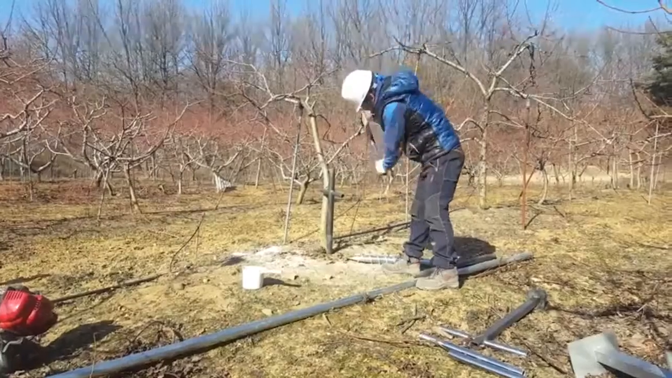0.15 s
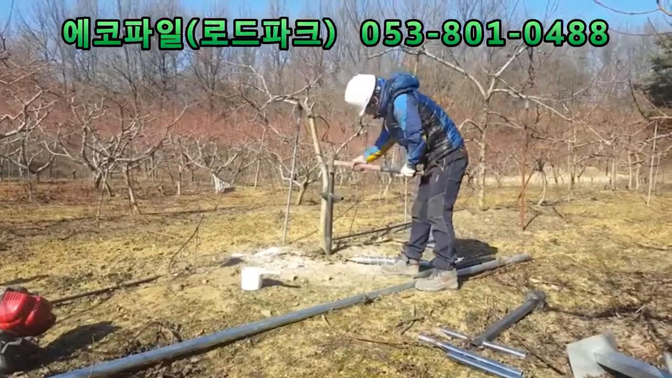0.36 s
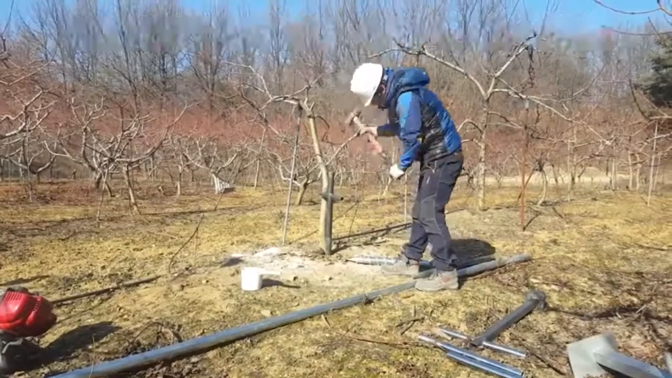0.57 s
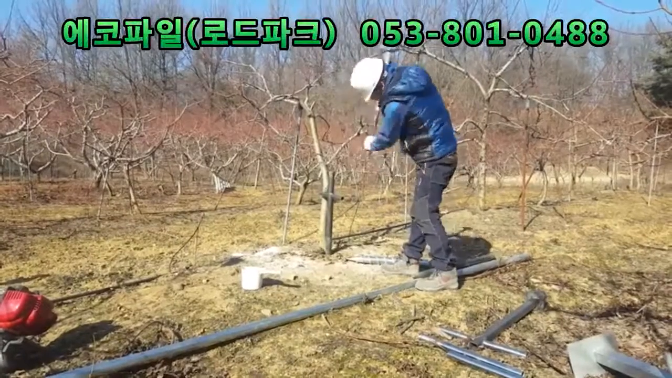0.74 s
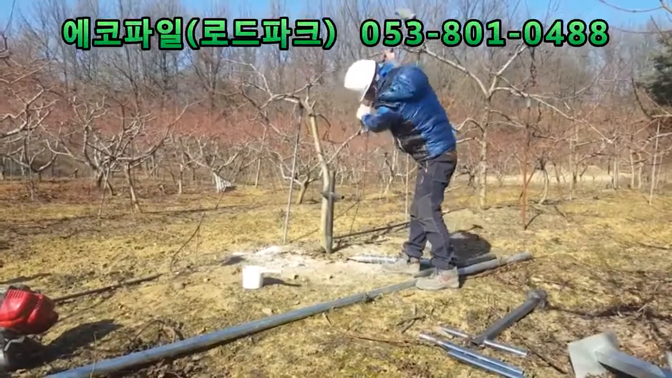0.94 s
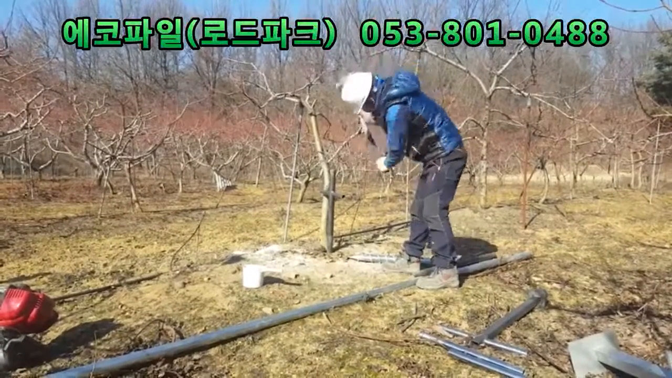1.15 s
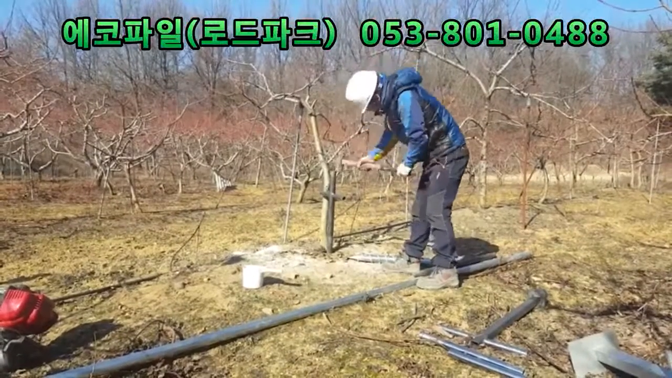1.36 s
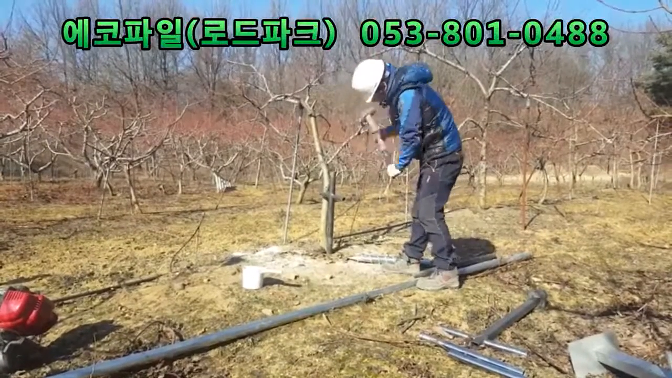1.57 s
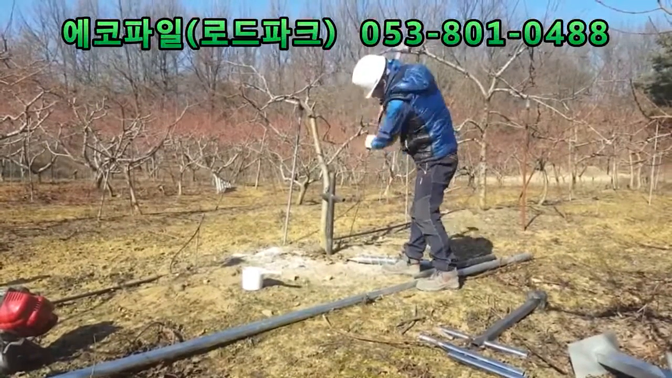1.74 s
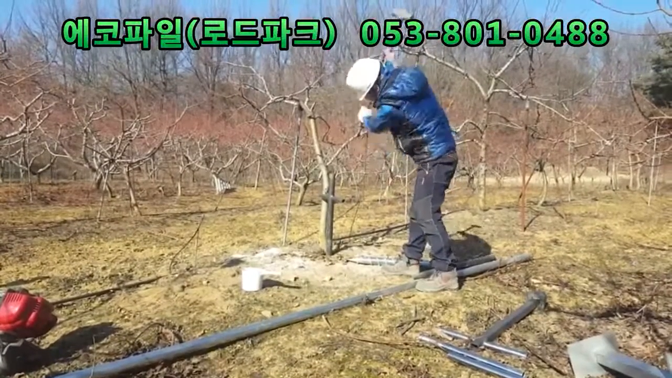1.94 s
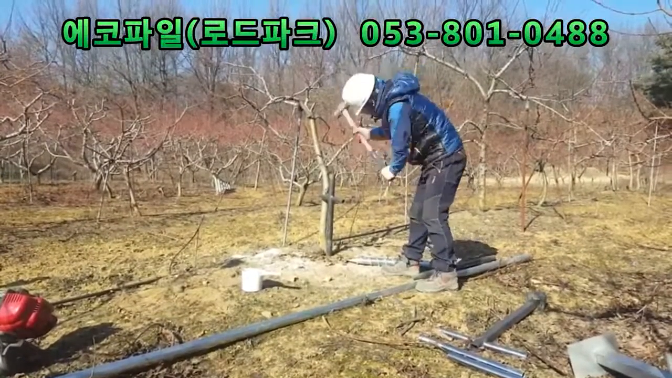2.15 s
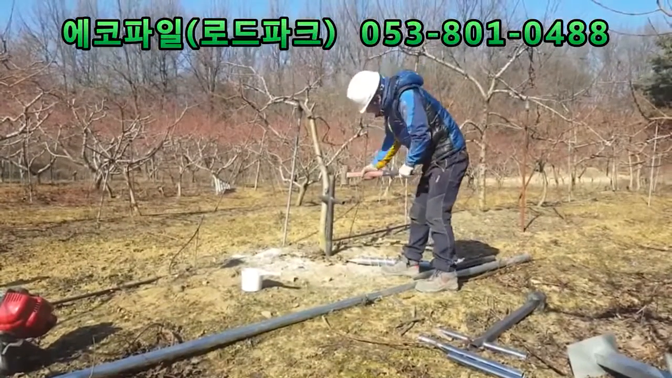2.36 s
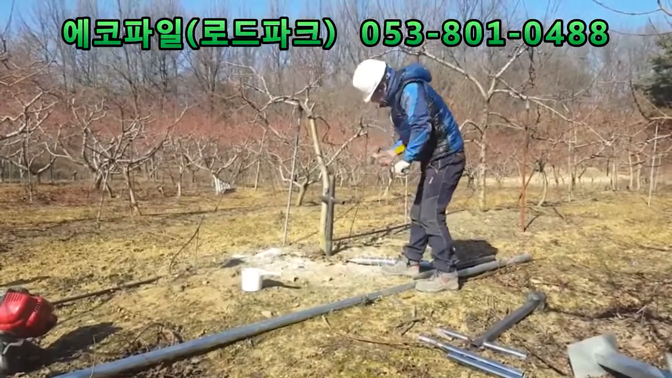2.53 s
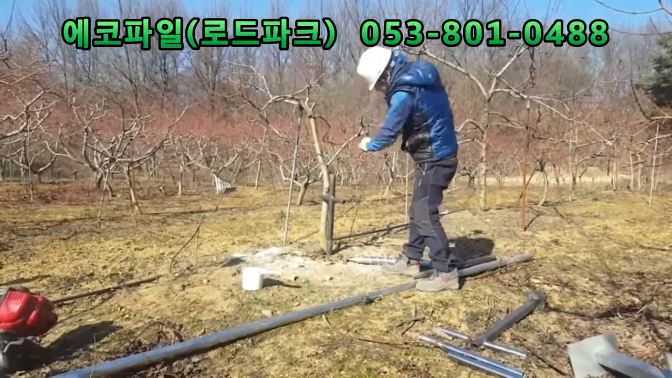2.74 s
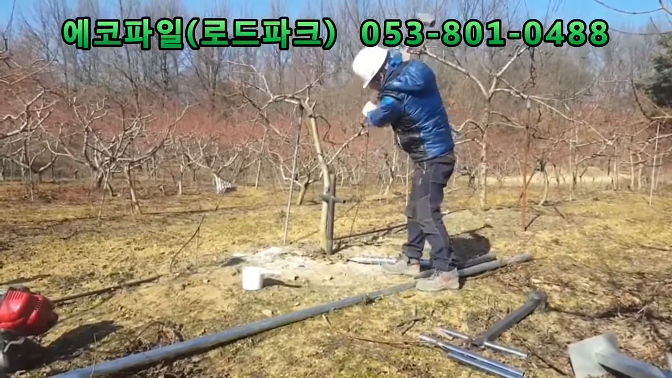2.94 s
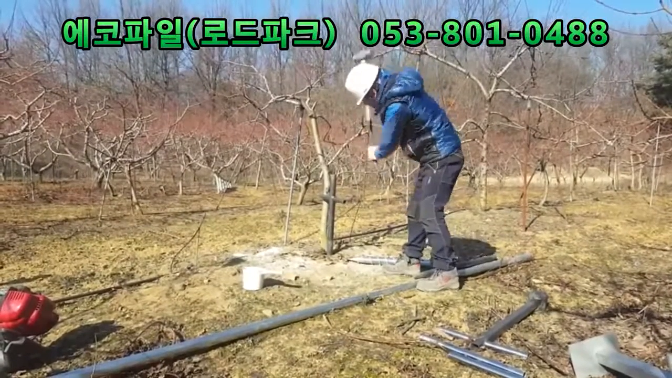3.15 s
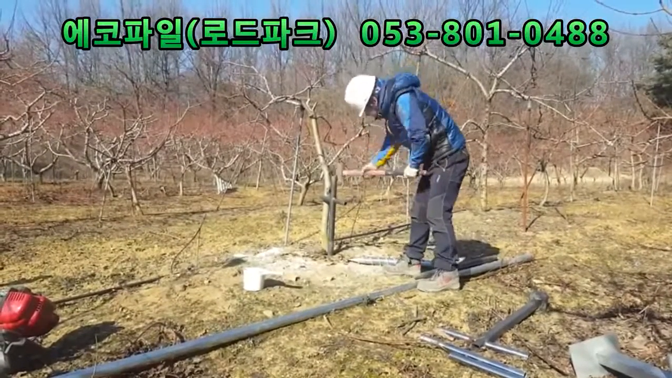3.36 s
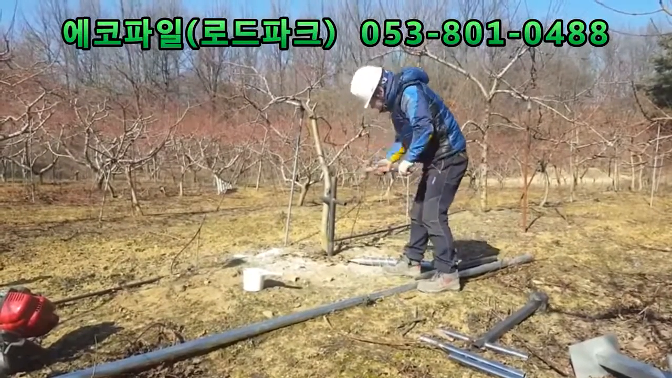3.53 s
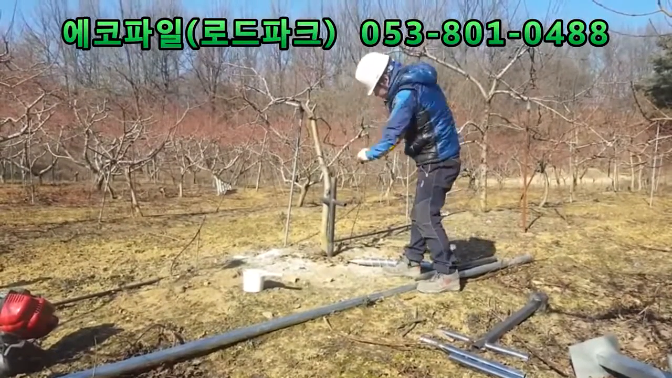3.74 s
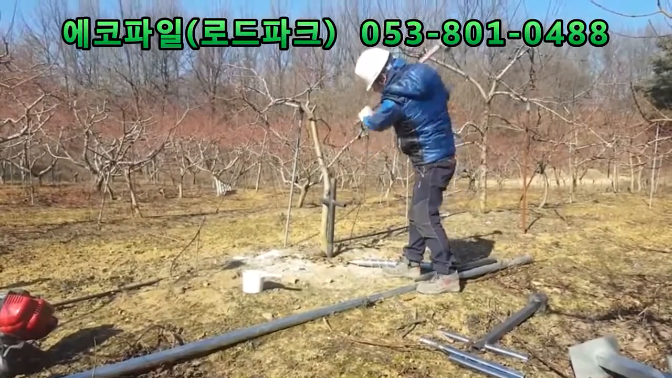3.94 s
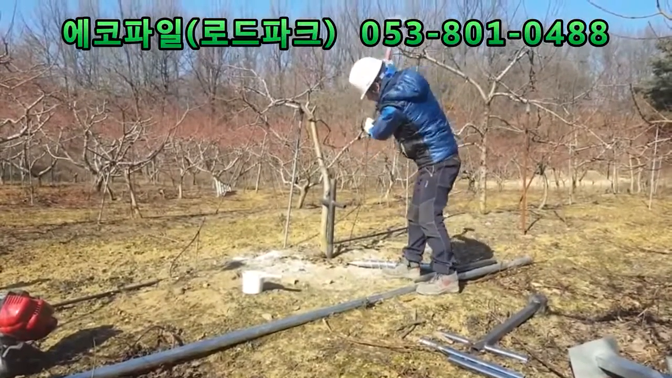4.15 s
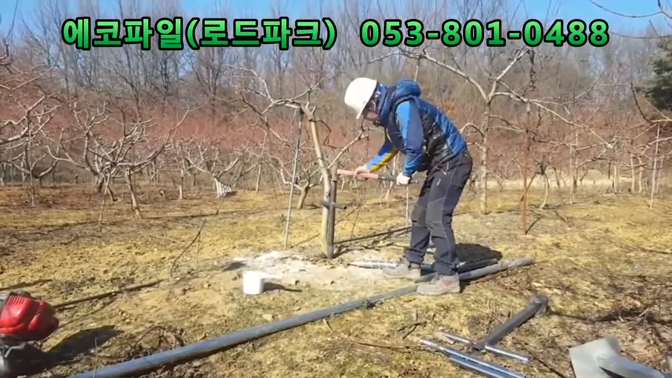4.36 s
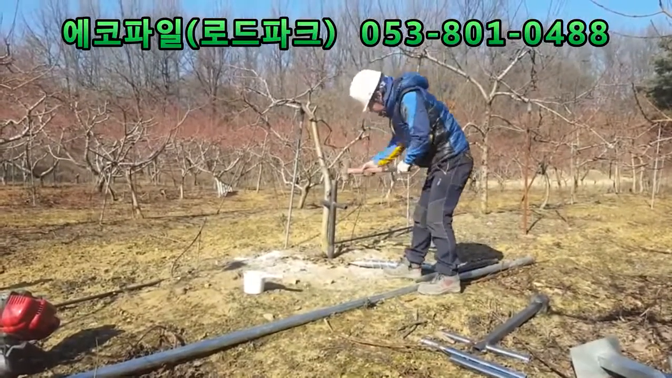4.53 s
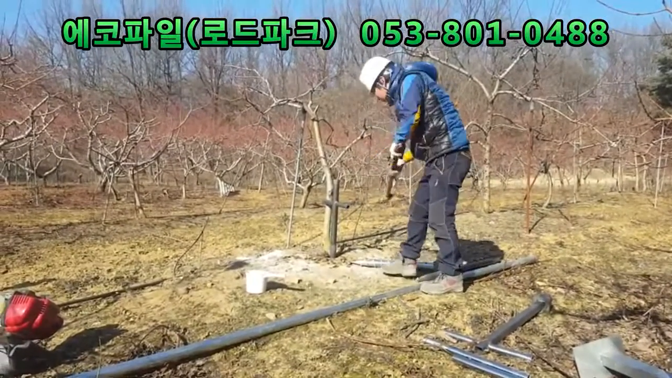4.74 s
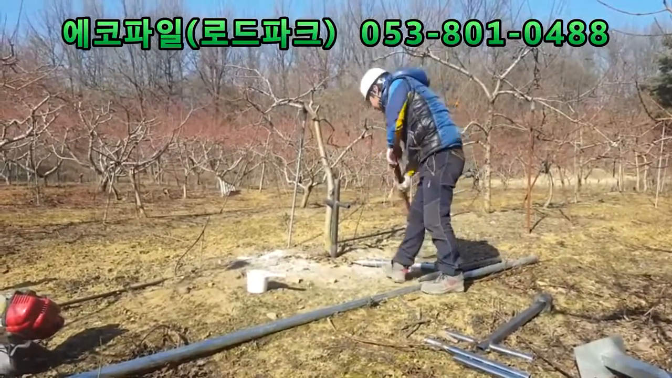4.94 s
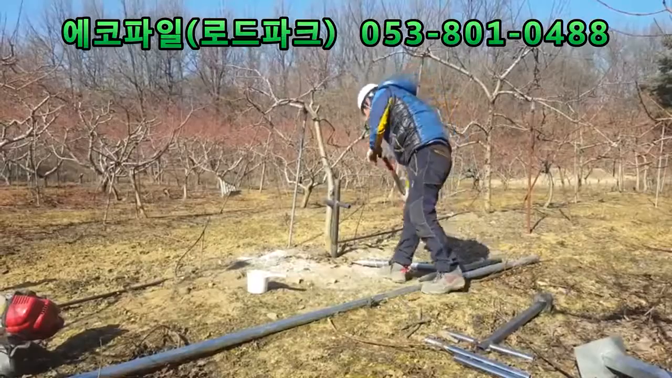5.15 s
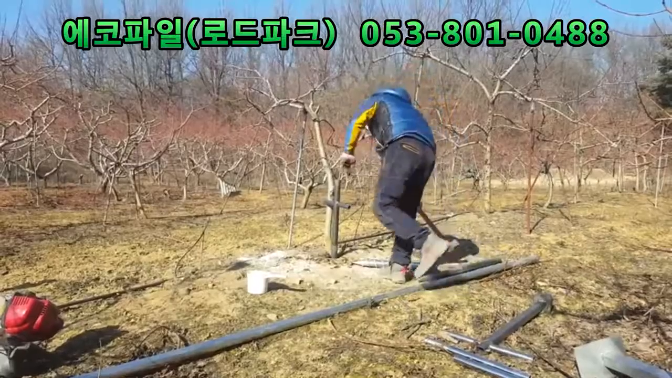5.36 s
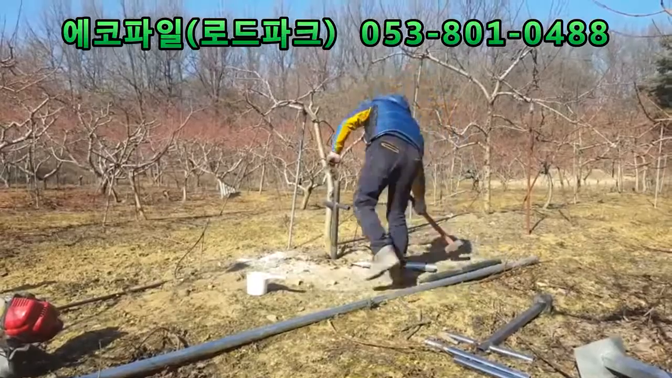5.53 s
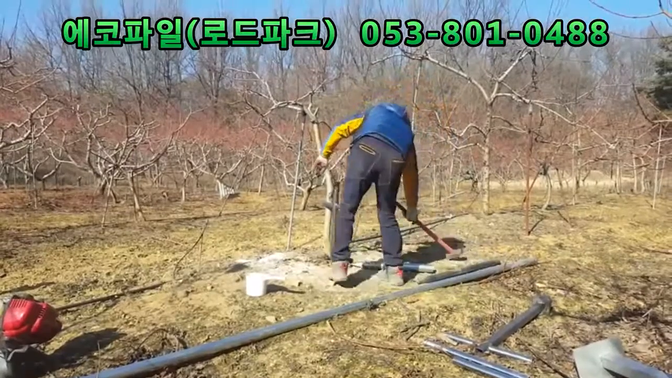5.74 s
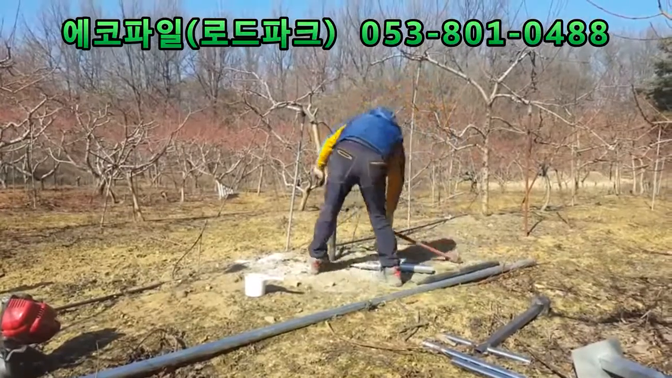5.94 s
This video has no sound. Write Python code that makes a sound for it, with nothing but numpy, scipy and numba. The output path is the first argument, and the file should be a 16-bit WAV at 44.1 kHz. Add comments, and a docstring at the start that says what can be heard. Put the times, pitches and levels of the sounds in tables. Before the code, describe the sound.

Five slow sledgehammer blows on a steel pipe stake ring out sharply in an open orchard, then grassy footsteps and dull knocks.

```python
"""Five sledgehammer blows drive a steel pipe stake into an orchard floor, a few metres away.
Noise bursts give the crack and the soil thud, decaying modes the ring; scattered noise returns from the trees.
The worker's jacket swishes with the swings; he steps away over dry grass and puts the hammer down.
Shaped noise makes the light wind and the rustle. A gain control ducks at every blow and creeps back up,
so the wind swells between the blows."""
import sys
import numpy as np
from scipy import signal
from scipy.fft import rfft, irfft, next_fast_len
from scipy.io import wavfile
from scipy.ndimage import uniform_filter1d, minimum_filter1d
from numba import njit

SR = 44100
rng = np.random.default_rng(int(sys.argv[2]) if len(sys.argv) > 2 else 0)


def wrap_up_sound(samples):
    """Save the sound to the file named by the first command line argument, as 16-bit audio."""
    columns = np.atleast_2d(samples).T
    # keep every value between -1 and 1, then stretch to whole-number steps
    tamed = np.clip(columns, -1, 1)
    steps = np.round(tamed * 32767).astype(np.int16)
    wavfile.write(sys.argv[1], SR, steps)


N = 268789
TIME = np.arange(N) / SR
AGE = TIME[:SR]  # the second after an impact, s
LEFT_RIGHT = np.array([[1], [-1]])  # opposite signs for the two channels

# Slow changes of the breeze: (t/s, level/dB)
BREEZE = [(0, -65.5), (.6, -60.5), (1.2, -68.5), (1.75, -70.5), (1.93, -82), (2.25, -68), (3.0, -68.5),
          (5.1, -70.5), (5.4, -68.5), (5.65, -72.5), (6.05, -67)]
# Spectrum of the wind: (f/Hz, level/dB per Hz)
WIND_COLOUR = [(20, -17), (36, -11.5), (52, 4), (100, -1), (160, -6), (240, -12.5), (330, -18), (700, -18),
               (1300, -23.5), (2500, -27.5), (4000, -42.5)]
# Spectrum of the rustle of grass and clothing: (f/Hz, level/dB per Hz)
RUSTLE_COLOUR = [(530, -30), (900, -33.5), (1510, -23.5), (2020, -5.5), (3040, 1.5), (4050, -3),
                 (8450, -6.5), (10200, -17), (13200, -16), (15200, -35.5), (16000, -50)]
GRASS_DB = -18  # rustle of dry grass in the breeze, relative to the wind
# Likeness of the two microphones, for the open air and for the sounds nearby: (f/Hz, correlation)
AIR_LIKENESS = [(60, 1), (290, 0.9), (640, 0.84), (1400, 0.021), (7000, 0.24)]
BLOW_LIKENESS = [(100, .1), (400, .2), (1400, 0.95), (3100, .7), (6800, 0.34), (15000, .15)]

# The jacket swishes during each downswing, loudest just before the blow
SWING_DB, SWING_LEAD_S, SWING_WIDTH_S = -85.5, 0.084, 0.13
# He walks off over the grass
WALK_START_S, WALK_RISE_S, WALK_DB = 5.51, 0.26, -87.5

# Orchard rows, then the tree line: (distance/m, level/dB, rise/s, T60/s)
TREES = [(16.9, 16, 0.0082, 0.24), (43, -2.5, 0.012, 0.88)]
# Spectrum of the scattered sound: (f/Hz, level/dB per Hz)
ECHO_COLOUR = [(100, -1.5), (600, -1.5), (1100, 0), (1800, -5), (2300, -1.5), (3300, -4.5), (4300, -11.5),
               (5200, -5), (6500, -12.5), (8000, -6), (14000, -20)]
SOUND_M_S = 343

# A boot drags over the soil as he turns away; spectrum: (f/Hz, level/dB per Hz)
DRAG_COLOUR = [(250, 4), (600, 0), (1200, 1.5), (2000, -13.5), (5000, -21)]
DRAG_S, DRAG_WIDTH_S, DRAG_DB = 5.42, 0.084, -76.5

# Short scuffs of glove, sleeve and boots: (t/s, level/dB, rise/s, T60/s)
SCUFFS = [(.245, -62.5, 0.01, 0.14), (.296, -63, 0.0056, 0.12), (1.243, -60.5, 0.0032, 0.11),
          (2.219, -56, 0.0016, .055), (4.3551, -64.5, 0.0014, 0.12), (5.727, -77.5, 0.0029, .08)]
# Spectrum of a scuff: (f/Hz, level/dB per Hz)
SCUFF_COLOUR = [(200, -3), (700, -2), (1700, 5), (3500, -2), (7500, -5.5), (10000, -21.5), (14000, -26.5)]
# Dull knocks of handle, boots and hammer set down: (t/s, level/dB, T60/s, tilt/dB per octave)
KNOCKS = [(1.868, -66.5, 0.017, 2), (4.2313, -51, 0.015, -2.5), (5.118, -58, 0.032, 0.5),
          (5.9174, -53.5, 0.024, 0), (5.9814, -48, 0.025, 1), (5.992, -58, 0.09, -2)]
# Spectrum of a knock before its tilt: (f/Hz, level/dB per Hz)
KNOCK_COLOUR = [(60, -3), (200, 8), (500, 0), (1000, -9), (1900, -3), (2800, -9.5), (3800, -10),
                (5500, -29.5), (14000, -34)]
# Damped modes of the hammer head as it lands: (f/Hz, level/dB, T60/s)
CLACK_MODES = [(954, -14.5, 0.061), (1990, -18, 0.035), (2710, -11, 0.026), (3180, 1, 0.018),
               (3610, -1, 0.013)]
CLACK_S, CLACK_DB = 5.9815, -50

# The blows: (t/s, then level/dB of crack, clatter, pipe modes, wall ring, rim ring, high ping,
# its twin relative to the ping, and ground thud; treble tilt/dB per octave)
BLOWS = [(0.3519, 9.5, 3.5, 1.5, 4, -2.5, 4, 1.5, -8, 0), (1.3354, 1.5, 2, -1, 1, -1, -0.5, -4.5, 7, 0.9),
         (2.3088, 0.5, 1.5, 0.5, -6.5, -2, -8, 1, -1, -1),
         (3.368, -0.5, 2, -1, -10, 3.5, -6, 5.5, 7.5, 0.5),
         (4.445, 1, 4.5, -2.5, -28.5, 7, 0.5, 4, -13, 1.38)]
# Spectrum of the crack of steel on steel: (f/Hz, level/dB per Hz)
CRACK_COLOUR = [(100, -15), (500, -15), (1100, -1), (1450, -11), (1800, 3.5), (2600, 5), (3300, -1),
                (4200, -9.5), (5200, 1), (6200, -7), (9000, -8.5), (10500, -23), (13000, -11.5),
                (15000, -13)]
# Heavily damped modes of the struck top: (f/Hz, level/dB, T60/s)
HEAD_MODES = [(1160, -16, .04), (1525, -19.5, 0.015), (1778, -1, 0.029), (1848, -9.5, 0.026),
              (2280, -12.5, 0.035), (2649, -11, 0.025), (5104, -11, 0.028)]
# Stake: odd multiples of its air column to about 1 kHz, the steel above: (f/Hz, level/dB, T60/s)
PIPE_MODES = [(78, -39.5, 0.66), (235.6, -38, 0.54), (389, -45, 0.46), (547, -31, 0.34), (720, -26, .26),
              (840, -34, .22), (1019, -24, 0.17), (1149, -24.5, .15), (1146, -24, 0.16),
              (1840, -23.5, 0.16), (2213, -16, 0.13), (2600, -29.5, 0.2), (3027, -21.5, 0.18),
              (5185, -17.5, 0.15), (5300, -42, 0.25), (5600, -44, 0.25), (7100, -20.5, 0.18),
              (8000, -49.5, .42), (9970, -31.5, 0.06), (11990, -34, 0.099), (13000, -42, .15),
              (13700, -36, 0.13), (14660, -33, 0.072)]
# Ovalling modes of the pipe wall: (f/Hz, level/dB, T60/s)
WALL_MODES = [(3482, -11, .135), (3580, -21, .12), (4048, -29, .21), (4660, -40, .24)]
# Modes of the battered rim: (f/Hz, level/dB, T60/s)
RIM_MODES = [(3274, -14, .11), (3294, -20, .1), (5232, -21, .17), (5214, -37, .33), (7034, -22, .15),
             (7711, -43, .42), (7962, -37, .25), (8716, -38, .15), (8926, -35, .18), (9168, -35, .19)]
# A close pair that beats in the long high ping: (f/Hz, level/dB, T60/s)
PING_MODES = [(6449.5, -12, .37), (6489, -14, .2)]
# Crowded short modes of the rattling pipe: (f/Hz, level/dB per Hz, T60/s)
CLATTER = [(150, -4.5, 0.083), (484, -9, 0.1), (1100, -5, 0.2), (1380, -5, 0.068), (1800, -2, 0.15),
           (2720, -4, 0.12), (3300, -0.5, 0.16), (4200, -8, 0.11), (5300, -2, 0.16), (5650, -12, 0.15),
           (6760, -7, 0.28), (9300, -15, 0.19), (10000, -24, .15), (14500, -23.5, .12)]
# Spectrum of the soil taking the blow: (f/Hz, level/dB per Hz)
THUD_COLOUR = [(25, -24), (70, 0.5), (130, 0.5), (350, -2), (700, -8), (1500, -34.5)]
# Balance of the blows: (f/Hz, left minus right level/dB)
BLOW_PAN = [(70, -1), (150, 3), (330, 7), (700, 1.5), (1800, -.7), (3300, 0), (6500, 2), (8900, 7),
            (15000, 6)]
# Phase of the blows: (f/Hz, lead of left over right/rad)
BLOW_PHASE = [(200, .1), (1200, .6), (3000, .55), (9000, .7)]

# Gain control: peak it aims for, most boost, boost at the start, speed of recovery
AIM, BOOST_DB, START_DB, RECOVER_DB_PER_S = 0.75, 23.5, 12.5, 20.5
DIP_S = (4.845, 4.882)  # start and end of a brief dip in level
TOP_HZ = 15700  # upper edge of the passband


def undb(db):
    """Level and amplitude: 20 dB is a factor of ten."""
    return 10 ** (np.asarray(db) / 20)


def at_hz(table, hz):
    """Linear interpolation of (f/Hz, value) rows on a log-frequency axis."""
    points, values = np.transpose(table)
    return np.interp(np.log(np.maximum(hz, 1)), np.log(points), values)


def shape(table, hz):
    """Spectral shaping: gain of a (f/Hz, level/dB) curve that falls away beyond its ends."""
    below = np.minimum(hz / table[0][0], 1)
    above = np.minimum(table[-1][0] / np.maximum(hz, 1), 1)
    return undb(at_hz(table, hz)) * (below * above) ** 2


def sides(pan_db):
    """Interchannel level difference, shared equally by left and right gains."""
    return undb(LEFT_RIGHT * pan_db / 2)


def noise(colour, likeness, size):
    """Partial coherence: a common and an opposed noise set the likeness of two channels; rms is 1."""
    hz = np.fft.rfftfreq(size, 1 / SR)
    mid, side = rfft(rng.standard_normal((2, size)))
    alike = np.clip(at_hz(likeness, hz), -1, 1)
    pair = mid * np.sqrt(1 + alike) + LEFT_RIGHT * side * np.sqrt(1 - alike)
    x = irfft(pair * shape(colour, hz), size)
    return x / x.std()


def fade(t60):
    """Exponential decay: the level falls 60 dB in t60 seconds."""
    return np.exp(-np.log(1000) * AGE / t60)


def swell(rise_s):
    """Exponential build-up with time constant rise_s."""
    return 1 - np.exp(-AGE / rise_s)


def slow_chance(rate_hz):
    """Random fluctuation: smoothed held draws, about rate_hz new ones a second, with a spread of 1."""
    hold = int(SR / rate_hz)
    steps = np.repeat(rng.standard_normal(N // hold + 1), hold)[:N]
    x = uniform_filter1d(steps, hold)
    return x / x.std()


def add(out, start_s, x):
    """Superposition: mix x into out from a given time."""
    i = int(start_s * SR)
    out[:, i:i + x.shape[1]] += x[:, :N - i]


def burst(colour, likeness, t60, rise_s):
    """Transient noise: a decaying puff whose energy is the same every time."""
    envelope = fade(t60) * swell(rise_s)
    x = noise(colour, likeness, size=SR) * envelope
    return x * np.sqrt(2 * np.sum(envelope ** 2) / np.sum(x ** 2))


def ring(modes, detune=0.00082, scatter=1):
    """Modal sum of decaying sines; scatter unsettles the phases, a little differently per channel."""
    out = 0
    for hz, db, t60 in modes:
        drift, skew = rng.standard_normal(2)
        phase = scatter * (rng.uniform(0, 2 * np.pi) + LEFT_RIGHT * skew * 0.36)
        tone = np.sin(2 * np.pi * hz * (1 + detune * drift) * AGE + phase)
        out = out + undb(db) * fade(t60) * tone
    return out


def movement():
    """Friction noise follows motion: a swell with every downswing, then steady as he walks off."""
    swings = sum(np.exp(-.5 * ((TIME - s + SWING_LEAD_S) / SWING_WIDTH_S) ** 2) for s, *_ in BLOWS)
    walking = np.clip((TIME - WALK_START_S) / WALK_RISE_S, 0, 1)
    return undb(SWING_DB) * swings + undb(WALK_DB) * walking


def air(gust_db=0.64, crinkle_db=1.07):
    """Wind buffets at low frequency and stirs dry grass; the worker's rustle adds to it in power."""
    breeze = undb(np.interp(TIME, *np.transpose(BREEZE)))
    size = next_fast_len(N)
    wind = noise(WIND_COLOUR, AIR_LIKENESS, size=size)[:, :N] * breeze
    gusts = undb(gust_db * slow_chance(29))
    stirring = np.hypot(undb(GRASS_DB) * breeze, movement())
    rustle = noise(RUSTLE_COLOUR, AIR_LIKENESS, size=size)[:, :N] * stirring
    crinkle = undb(crinkle_db * slow_chance(100))
    return wind * gusts + rustle * crinkle


def tree_line(x, echo_db=-44, clumps_db=4.5):
    """Diffuse scattering: trunks and twigs answer after the round trip to each stand, then die away."""
    envelope = np.zeros((1, N))
    for metres, db, rise_s, t60 in TREES:
        stand = undb(db) * swell(rise_s) * fade(t60)
        add(envelope, 2 * metres / SOUND_M_S, stand[None])
    size = 2 * SR
    scattered = noise(ECHO_COLOUR, AIR_LIKENESS, size=size)
    clumps = undb(clumps_db * slow_chance(44))
    response = scattered * (envelope * clumps)[:, :size]
    response /= np.sqrt(np.sum(response ** 2) / 2)  # unit energy per channel on average
    mono = x.mean(axis=0, keepdims=True)
    return undb(echo_db) * signal.fftconvolve(mono, response, axes=1)[:, :N]


def boot_drag(grit_db=2.5):
    """Sliding friction: a sole on dry soil gives a short noise of gritty, uneven strength."""
    push = np.exp(-.5 * ((TIME - DRAG_S) / DRAG_WIDTH_S) ** 2)
    scrape = noise(DRAG_COLOUR, BLOW_LIKENESS, size=next_fast_len(N))[:, :N] * push
    return scrape * undb(DRAG_DB + grit_db * slow_chance(90))


def worker(pivot_hz=800):
    """Friction and damped impact: scuffs and dull knocks are noise bursts, the head's clack is modal."""
    out = np.zeros((2, N))
    for s, db, rise_s, t60 in SCUFFS:
        add(out, s, undb(db) * burst(SCUFF_COLOUR, BLOW_LIKENESS, t60, rise_s))
    for s, db, t60, tilt_db in KNOCKS:
        colour = [(hz, level + tilt_db * np.log2(hz / pivot_hz)) for hz, level in KNOCK_COLOUR]
        add(out, s, undb(db) * burst(colour, [(100, 1.0), (8000, 0.14)], t60, 0.00058))
    add(out, CLACK_S, undb(CLACK_DB) * ring(CLACK_MODES) * swell(0.00016))
    return out


def crowded_modes(knee_hz=260):
    """Modal density: random positions on a 1 Hz grid, further apart towards the treble."""
    spacing = np.maximum(np.fft.rfftfreq(SR, 1 / SR) / knee_hz, 1)
    present = rng.random(len(spacing)) < 1 / spacing
    return present * np.sqrt(spacing)  # sparser modes are stronger, so the mean power stays level


def clatter(modes):
    """Frequency-dependent damping: weak modes of random strength, each band dying at its own pace."""
    rows, hz = np.array(CLATTER), np.fft.rfftfreq(SR, 1 / SR)
    spectrum = rfft(noise(rows[:, :2], BLOW_LIKENESS, size=SR)) * modes
    out = 0
    for share, t60 in zip(np.eye(len(rows)), rows[:, 2]):
        band = at_hz(np.column_stack([rows[:, 0], share]), hz)  # overlapping bands that sum to 1
        out = out + irfft(spectrum * band, SR) * fade(t60)
    return out


def hammer(crack_db=-7, crack_t60=0.022, clatter_db=-16, thud_db=-21, thud_t60=.05,
           build_s=0.0033, sing_s=0.0054, pivot_hz=3000):
    """Impact excitation: a crack at the contact, a thud in the soil, a ring building up along the pipe."""
    out, hz, weak_modes = np.zeros((2, N)), np.fft.rfftfreq(SR, 1 / SR), crowded_modes()
    lead = np.exp(.5j * LEFT_RIGHT * at_hz(BLOW_PHASE, hz))
    ports = sides(at_hz(BLOW_PAN, hz)) * lead
    ending = np.clip(10 * (.9 - AGE), 0, 1)
    for s, hit_db, rattle_db, pipe_db, wall_db, rim_db, ping_db, twin_db, soil_db, tilt_db in BLOWS:
        crack = undb(crack_db) * burst(CRACK_COLOUR, BLOW_LIKENESS, crack_t60, .0003)
        crack = crack + ring(HEAD_MODES, detune=0.0033, scatter=0) * swell(0.0015)
        thud = undb(thud_db + soil_db) * burst(THUD_COLOUR, BLOW_LIKENESS, thud_t60, 0.0012)
        body = undb(clatter_db + rattle_db) * clatter(weak_modes)
        body = body + undb(pipe_db) * ring(PIPE_MODES) + undb(rim_db) * ring(RIM_MODES)
        ping = ring(PING_MODES[:1], detune=.00005)
        twin = undb(twin_db) * ring(PING_MODES[1:], detune=.0001)
        tones = undb(wall_db) * ring(WALL_MODES) + undb(ping_db) * (ping + twin)
        # a harder, shorter contact is brighter
        tilt = undb(tilt_db * np.log2(np.maximum(hz, 1000) / pivot_hz))
        tilted = rfft(undb(hit_db) * crack + body * swell(build_s)) * tilt
        untilted = rfft(thud + tones * swell(sing_s))
        add(out, s, irfft((tilted + untilted) * ports, SR) * ending)
    return out


def scene():
    """Superposition of the blows, their echo, the worker and the open air."""
    blows = hammer()
    return blows + tree_line(blows) + worker() + air() + boot_drag()


@njit
def peak_follower(x, release, start):
    """Envelope detection: jumps to each peak and sinks back exponentially."""
    out, e = np.empty(len(x)), start
    for i in range(len(x)):
        e = max(x[i], e * release)
        out[i] = e
    return out


def gain_control(x):
    """Automatic gain: a loud peak takes the boost away just ahead of itself, and it creeps back."""
    loudness = np.clip(np.abs(x).max(axis=0) / AIM, undb(-BOOST_DB), 1)
    release = float(undb(-RECOVER_DB_PER_S / SR))
    held = peak_follower(loudness, release, float(undb(-START_DB)))
    return x * uniform_filter1d(minimum_filter1d(1 / held, size=801), size=401)


def limiter(x, ceiling=1.3, release_s=0.043):
    """Peak limiting: holds the cracks down and lets the ring swell back."""
    peaks = peak_follower(np.abs(x).max(axis=0), np.exp(-1 / (release_s * SR)), 0.)
    gain = ceiling / np.maximum(peaks, ceiling)
    return x * uniform_filter1d(minimum_filter1d(gain, size=41), size=41)


def record(dry):
    """Gain control, limiting and soft saturation; the level dips briefly once; a low-pass cuts the top."""
    held = limiter(gain_control(dry))
    rounded = held / (1 + (held / .93) ** 6) ** (1 / 6)
    inside = (TIME > DIP_S[0]) & (TIME < DIP_S[1])
    dip = uniform_filter1d(np.where(inside, undb(-32.0), 1.), size=200)
    low_pass = signal.ellip(8, .2, 70, TOP_HZ, fs=SR, output="sos")
    return signal.sosfilt(low_pass, rounded * dip)


dry = scene()
out = record(dry)
wrap_up_sound(out)
```